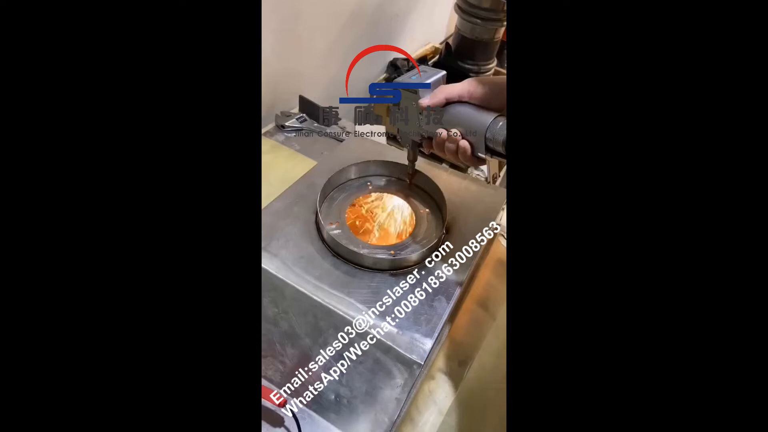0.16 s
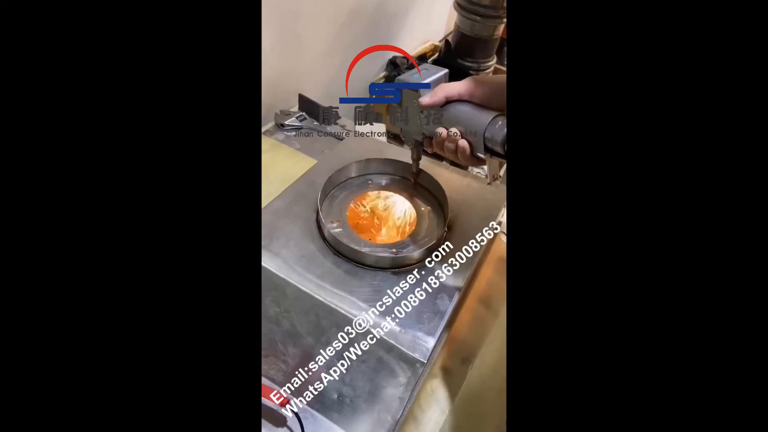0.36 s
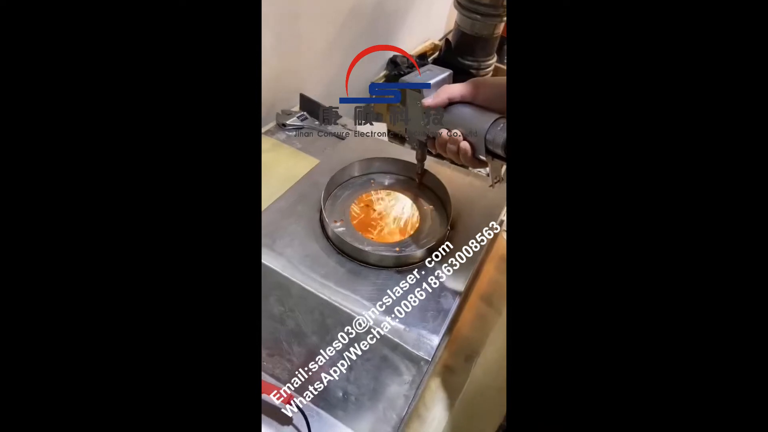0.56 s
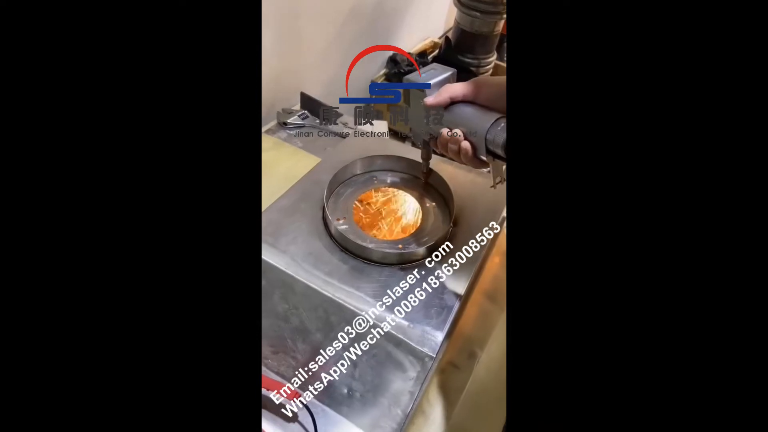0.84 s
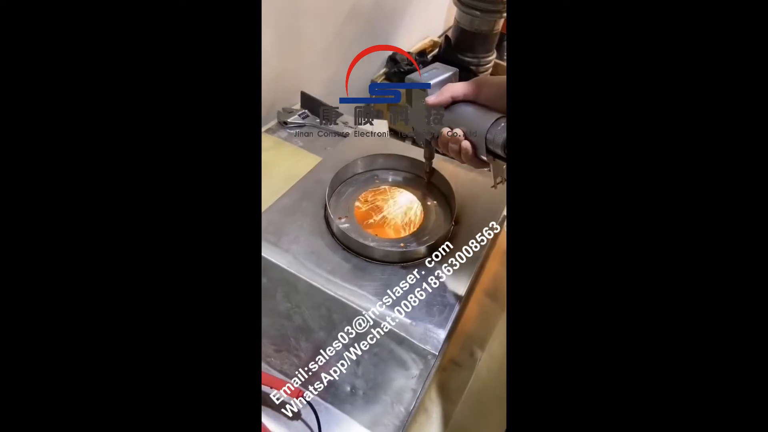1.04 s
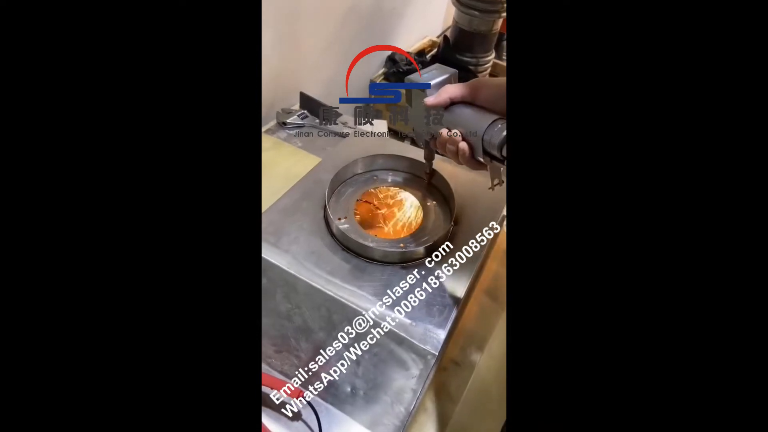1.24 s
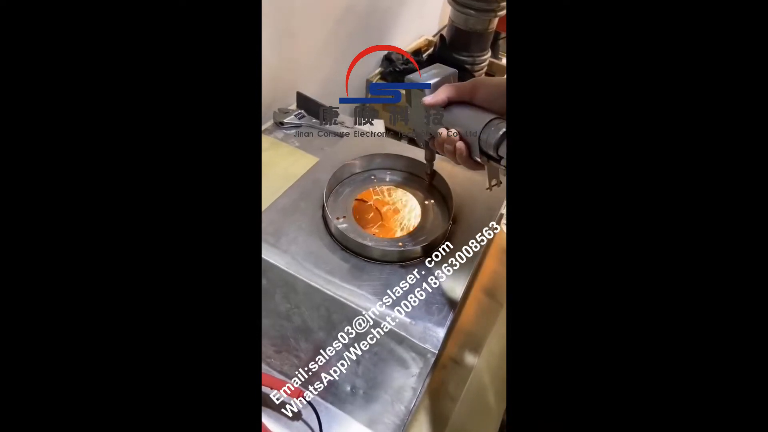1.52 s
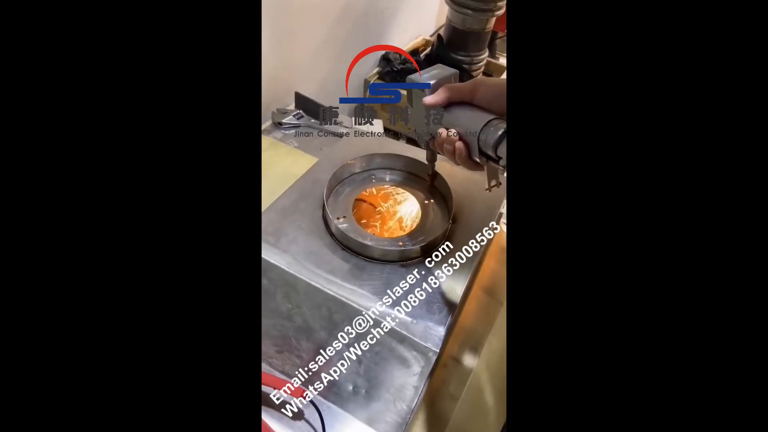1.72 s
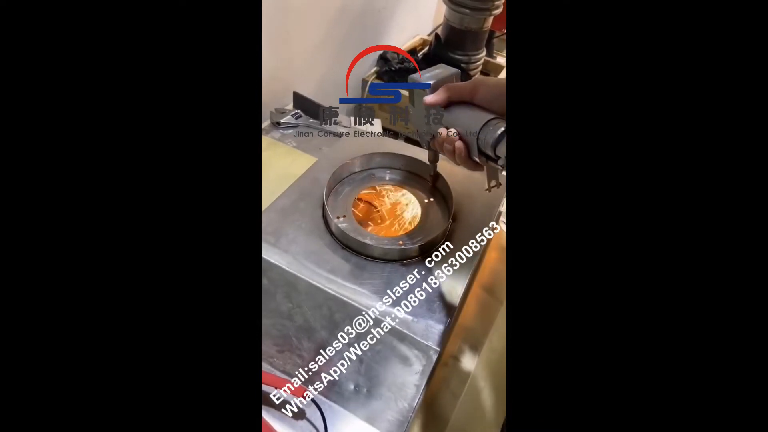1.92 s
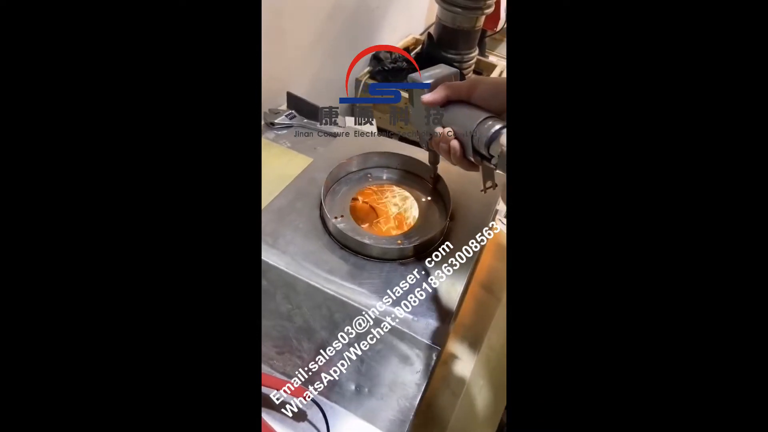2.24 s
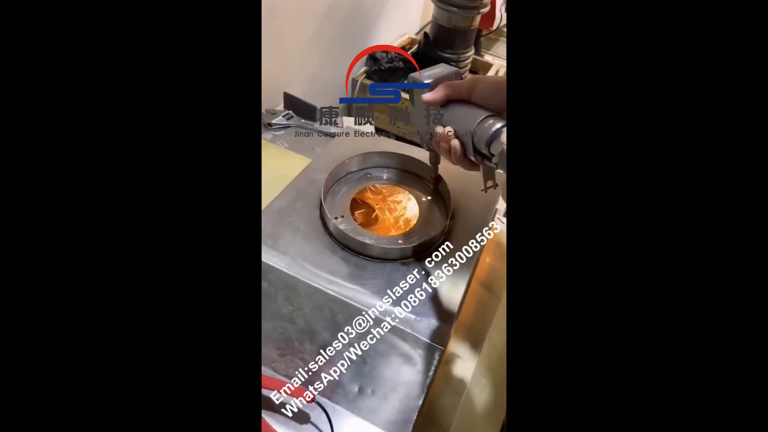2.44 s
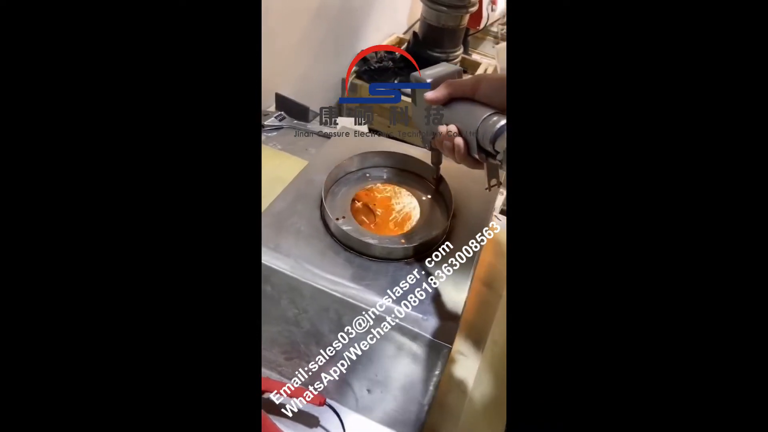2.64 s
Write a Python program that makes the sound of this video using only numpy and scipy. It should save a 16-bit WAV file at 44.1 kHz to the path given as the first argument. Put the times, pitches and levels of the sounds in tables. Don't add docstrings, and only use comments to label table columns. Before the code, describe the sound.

A handheld laser welder runs continuously: after a brief near-silence it cuts in abruptly with bright gas hiss, high piercing whines that waver, and a low cooling-unit hum, captured close by a phone in a workshop.

```python
import sys
import numpy as np
from scipy import signal
from scipy.fft import rfft, irfft, next_fast_len
from scipy.io import wavfile
from scipy.ndimage import uniform_filter1d

SR = 44100
rng = np.random.default_rng(int(sys.argv[2]) if len(sys.argv) > 2 else 0)


def boost_factor(decibels):
    exponent = np.asarray(decibels, float) / 20
    return 10 ** exponent


def dump(signal):
    limited = np.clip(np.atleast_2d(signal).T, -1, 1)
    pcm = np.round(limited * 32767).astype(np.int16)
    wavfile.write(sys.argv[1], SR, pcm)


N = 122157


def read(table, hz):
    table = np.array(table, float)
    return np.interp(np.log(hz), np.log(table[:, 0]), table[:, 1])


def walk(rate):
    hold = int(SR / rate)
    steps = np.repeat(rng.standard_normal(N // hold + 2), hold)
    return 1.45 * uniform_filter1d(uniform_filter1d(steps, hold), hold)[:N]


# (time [s], level [dB])
PULSE_TONE = [(0.66, -60), (0.75, -46), (0.77, -51), (0.94, -42.5), (0.96, -50), (1.01, -43), (1.25, -31),
              (1.28, -36.5), (1.46, -33.5), (1.56, -39), (1.65, -35), (1.83, -35.5), (2.05, -41.5),
              (2.19, -37.5), (2.23, -42), (2.46, -39.5), (2.66, -42.5), (2.77, -36.5)]
# (time [s], level [dB])
DOUBLE_TONE = [(0.17, -44), (0.31, -46), (0.36, -54), (0.65, -47.5), (0.96, -68), (1.03, -67), (1.72, -70),
               (1.89, -59), (2.07, -65), (2.11, -53), (2.32, -68), (2.77, -47)]
# (time [s], level [dB])
TRIPLE_TONE = [(0.17, -35.5), (0.49, -53), (1.13, -51), (1.23, -37), (1.34, -41), (2.06, -35.5),
               (2.31, -51), (2.33, -37), (2.52, -36), (2.58, -45), (2.73, -38), (2.77, -42)]
# (time [s], level [dB])
FOURFOLD_TONE = [(0.17, -54), (0.34, -53), (0.44, -57), (0.99, -47), (1.05, -52), (1.09, -42), (1.57, -46),
                 (1.63, -41), (1.78, -49), (2.07, -44), (2.15, -50), (2.77, -46)]
TONE_TRIM = [0.85, -0.46, -2.3, 0.25]
TONE_FLUTTER = [.9, 2., 2., 1.5]
TONE_SLIP = [.1, .5, 1., .4]


def beam_whine(t):
    pulse_hz = 3498.75
    whine = 0
    for k, rows in enumerate([PULSE_TONE, DOUBLE_TONE, TRIPLE_TONE, FOURFOLD_TONE]):
        times, levels = np.array(rows).T
        db = np.interp(t, times, levels) + TONE_TRIM[k] + TONE_FLUTTER[k] * walk(24.85)
        slip = TONE_SLIP[k] * walk(7.9)
        whine = whine + boost_factor(db) * np.sin(2 * np.pi * (k + 1) * pulse_hz * t + slip)
    return whine * np.sqrt(2)


# (frequency [Hz], width [Hz], boost [dB])
RESONANCES = [(68.6, 10, 6.5), (136, 15, 5), (458, 54, 5), (2200, 77, 0), (2920, 1200, 3.5), (5080, 110, 4),
              (5594, 64, 7), (9630, 130, 2), (10550, 270, 2), (11830, 150, 3)]
# (low edge [Hz], high edge [Hz])
DEAD_BANDS = [(7030, 7600), (13110, 13800), (3080, 4050), (15760, 30000)]
# (depth [dB], softness of low edge [Hz], of high edge [Hz])
DEAD_DEPTHS = [(-22, 60, 80), (-12, 25, 90), (-6, 40, 250), (-60, 20, 20)]
# (frequency [Hz], side minus mid [dB])
AIR_WIDTH = [(60, -14), (100, -32), (500, -12.5), (1500, -16.5), (4500, -18.5), (8000, -16.5), (11000, -20),
             (14500, -14)]


def turbulent_air(table, level_db, swell_db, flicker_db):
    size = next_fast_len(N)
    hz = np.arange(size // 2 + 1) * SR / size + 1
    octaves_outside = np.abs(np.log2(hz / np.clip(hz, table[0][0], table[-1][0])))
    db = read(table, hz) - 30 * octaves_outside
    for centre, width, boost in RESONANCES:
        db = db + boost / (1 + (2 * (hz - centre) / width) ** 2)
    for (low, high), (depth, low_soft, high_soft) in zip(DEAD_BANDS, DEAD_DEPTHS):
        above_low = 1 + np.tanh((hz - low) / low_soft)
        below_high = 1 + np.tanh((high - hz) / high_soft)
        db = db + depth / 4 * above_low * below_high
    spectrum = rfft(rng.standard_normal((2, size))) * boost_factor([db, db + read(AIR_WIDTH, hz)])

    air, shared = 0, walk(3.2)
    for centre in 20 * 2 ** (np.arange(30) / 3):
        share = np.cos(np.pi / 2 * np.clip(3 * np.log2(hz / centre), -1, 1)) ** 2
        shared = .8 * shared + .6 * walk(3)
        band = irfft(spectrum * share, size)[:, :N]
        air = air + band * boost_factor(swell_db * shared + flicker_db * walk(14))
    return air / np.std(air[0]) * boost_factor(level_db)


# (frequency [Hz], level per Hz [dB])
JET_COLOUR = [(3700, -9.5), (5640, -6.5), (6610, -12), (8030, -10), (10200, 0.5), (12900, -7.5),
              (14100, -15), (15700, -21)]
# (time [s], level [dB])
GAS_FLOW = [
    (0.17, -33.5),
    (0.23, -33.5),
    (1.32, -32),
    (1.34, -33),
    (2.06, -31.5),
    (2.3, -32),
    (2.34, -31.5),
    (2.75, -31),
    (2.77, -34.5),
]


def gas_jet(t):
    times, levels = np.array(GAS_FLOW).T
    return turbulent_air(JET_COLOUR, 0.5 + np.interp(t, times, levels), swell_db=.3, flicker_db=.7)


# (frequency [Hz], level per Hz [dB])
CABINET_COLOUR = [(15, -55), (25, -16.5), (97, -3.5), (245, -8.5), (301, -8), (354, -17), (2710, -10),
                  (3200, -17), (3400, -12), (4420, -8), (7480, -120)]


def cooling_cabinet():
    return turbulent_air(CABINET_COLOUR, -40, swell_db=.3, flicker_db=.8)


# (multiple of the hum rate, level [dB], phase [rad])
HUM_TONES = [
    (1, -40, 2.5),
    (2, -50.5, 0.64),
    (3, -39, 1.04),
    (4, -59, 1),
    (8, -65, 1),
]


def cabinet_hum(t):
    hum_hz, inverter_hz = 99.95, 14397
    hum = boost_factor(-66 + 3 * walk(5)) * np.sin(2 * np.pi * inverter_hz * t)
    for multiple, db, phase in HUM_TONES:
        hum = hum + boost_factor(db + 0.34 * walk(4.63)) * np.cos(2 * np.pi * multiple * hum_hz * t + phase)
    return hum * np.sqrt(2)


def scene():
    t = np.arange(N) / SR
    whine, hum = beam_whine(t), cabinet_hum(t)
    mid, side = gas_jet(t) + cooling_cabinet()
    side = side + boost_factor(-23) * walk(15) * whine
    mid = mid + whine + hum
    side = side - .03 * (mid - .7 * hum)
    return np.array([mid + side, mid - side])


# (frequency [Hz], drop threshold against the neighbourhood [dB])
MASKING = [(900, -12), (3000, -10), (4100, -8), (5500, -11), (7000, -6), (9000, -13), (12000, -12),
           (13400, -7), (14000, -9), (15000, -4)]
# (frequency [Hz], readiness [spreads of chance])
SIDE_SURVIVAL = [(300, 1.3), (1200, -.2), (6000, -.1), (9500, 1.), (12000, -.1), (14500, -.9)]


def thin(x):
    window = np.sin(np.pi * (np.arange(2048) + .5) / 2048)
    stereo = np.array([x[0] + x[1], x[0] - x[1]])
    hz, _, (mid, side) = signal.stft(stereo, SR, window, len(window))

    def patches(bins):
        values = uniform_filter1d(rng.standard_normal((130, mid.shape[1])), 2) * 1.41
        return np.repeat(values, bins, axis=0)[:len(hz)]

    near = uniform_filter1d(np.abs(mid) ** 2, int(1300 / hz[1]), axis=0) ** .5
    threshold_db = read(MASKING, hz + 1)[:, None] + 4.5 * patches(8)
    audible = np.abs(mid) > near * boost_factor(threshold_db)
    mid = mid * (audible | (hz < 900)[:, None])

    wide = patches(16)
    chance = .7 * wide + 1.8 * uniform_filter1d(wide, 130, axis=0)
    lucky = chance > -read(SIDE_SURVIVAL, hz + 1)[:, None]
    strong = (np.abs(side) > near / 3) & (chance > -1)
    side = side * (lucky | strong)
    mid, side = signal.istft(np.array([mid, side]), SR, window, len(window))[1][:, :N]
    return np.array([mid + side, mid - side]) / 2


def roll_off(x):
    return signal.sosfilt(signal.butter(12, 16820, fs=SR, output="sos"), x)


def record(dry):
    start_s, smear_s = .163, .026
    since_start = np.arange(N) / SR - start_s
    rise = np.sin(np.pi / 2 * np.clip(1 + since_start / smear_s, 0, 1))
    smear = rise * (since_start < 0) * boost_factor(-50.5)
    lowpass = signal.butter(10, 15500, fs=SR, output="sos")
    noise = signal.sosfilt(lowpass, rng.standard_normal(N))
    mix = thin(dry) * (since_start >= 0) + smear * noise
    return roll_off(mix)


dry = scene()
out = record(dry)
dump(out)
```